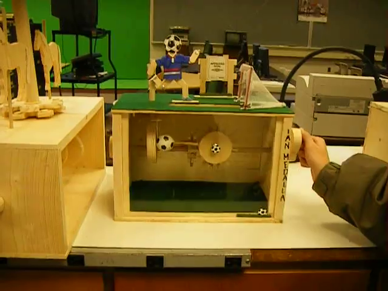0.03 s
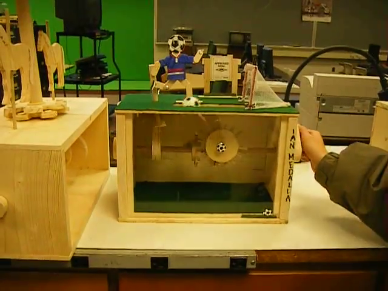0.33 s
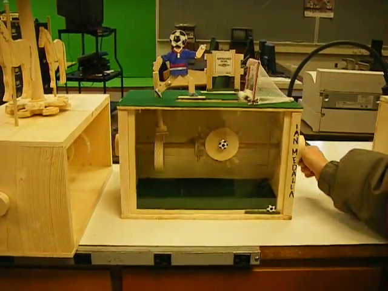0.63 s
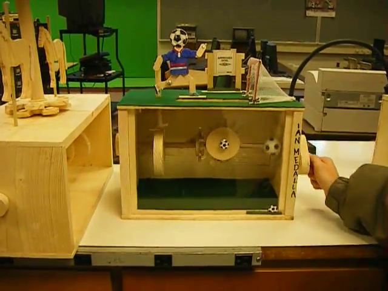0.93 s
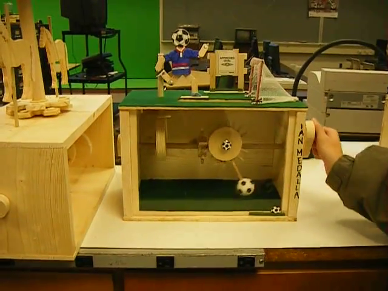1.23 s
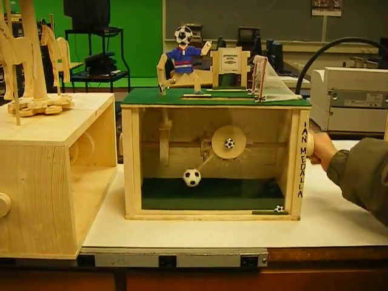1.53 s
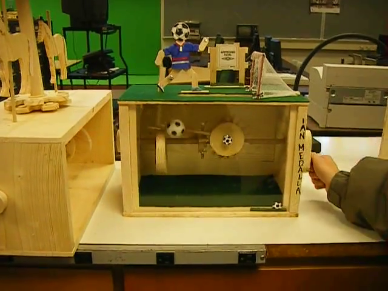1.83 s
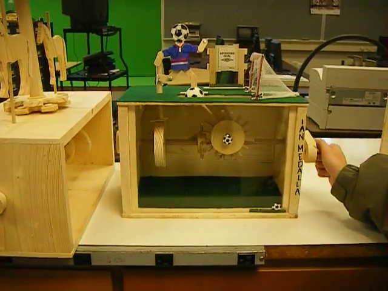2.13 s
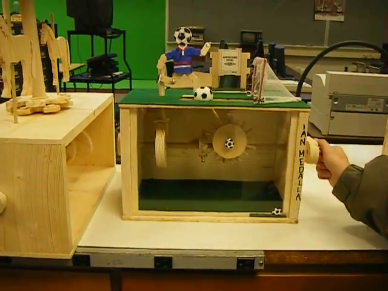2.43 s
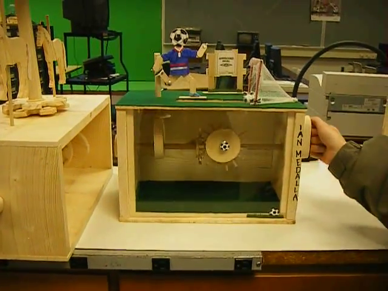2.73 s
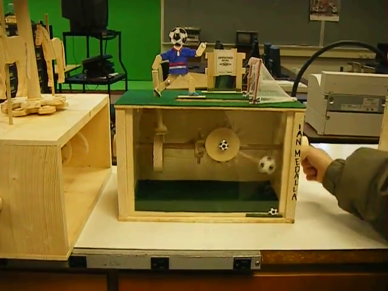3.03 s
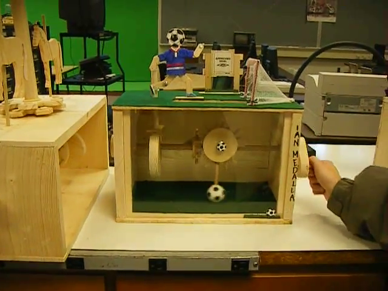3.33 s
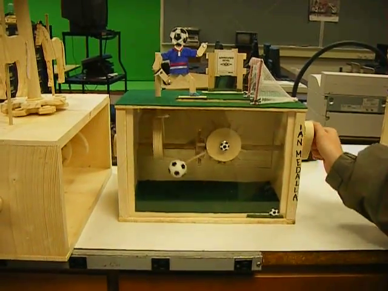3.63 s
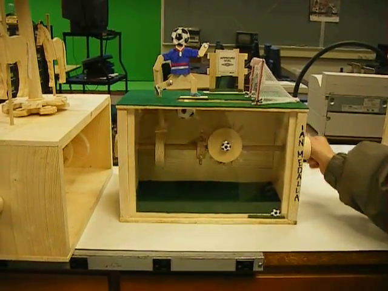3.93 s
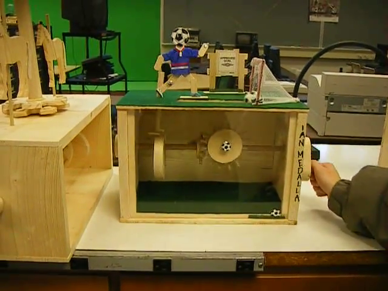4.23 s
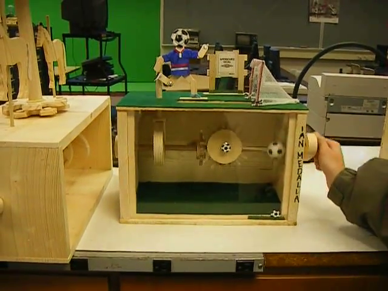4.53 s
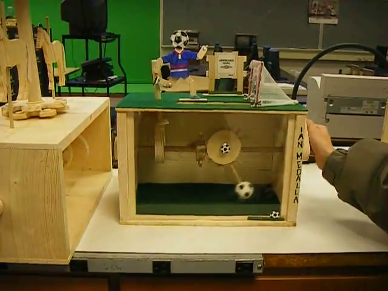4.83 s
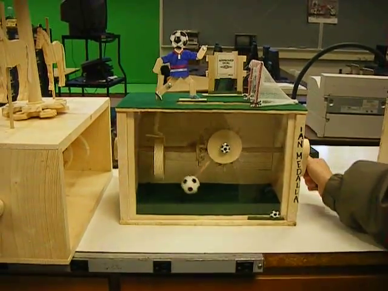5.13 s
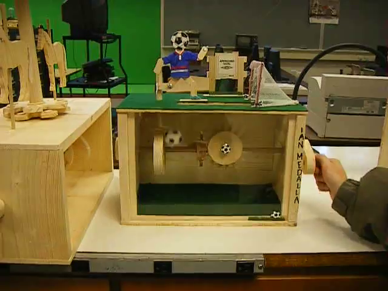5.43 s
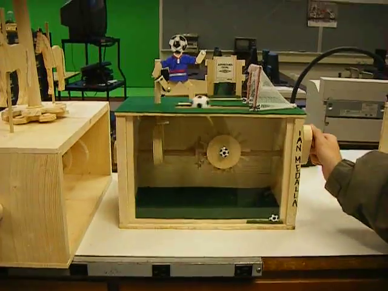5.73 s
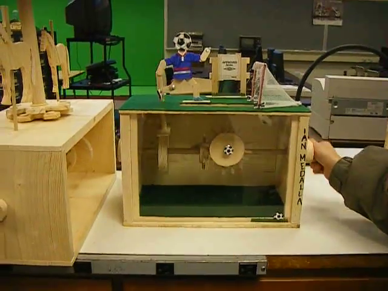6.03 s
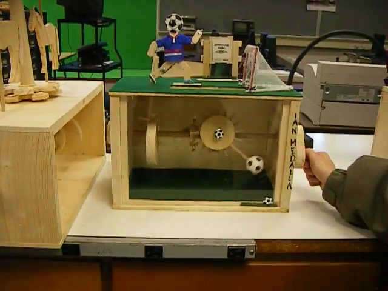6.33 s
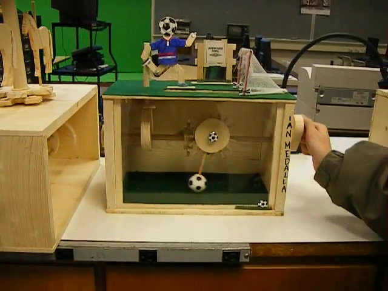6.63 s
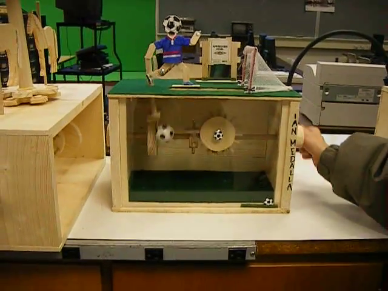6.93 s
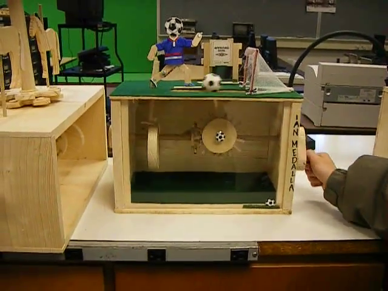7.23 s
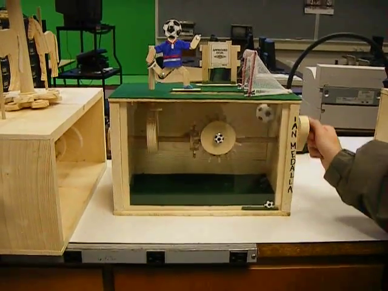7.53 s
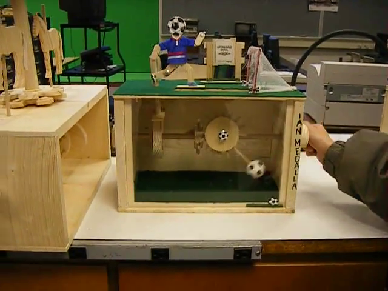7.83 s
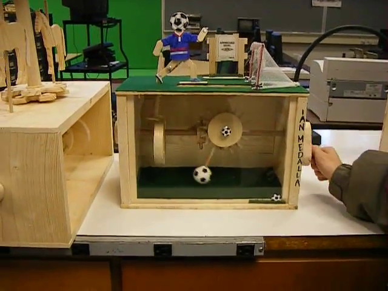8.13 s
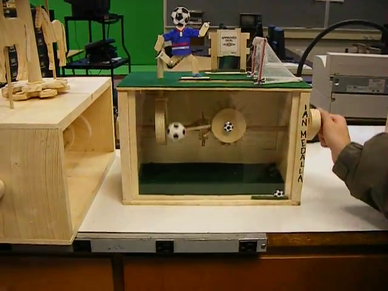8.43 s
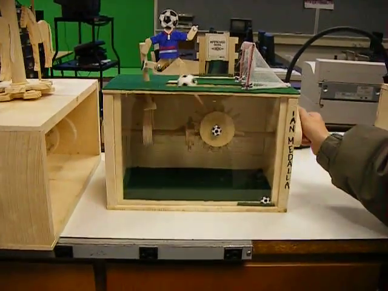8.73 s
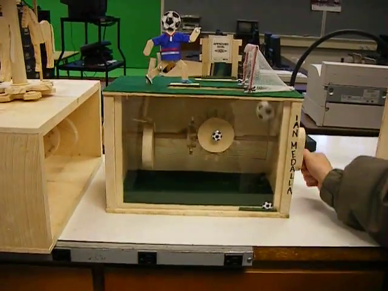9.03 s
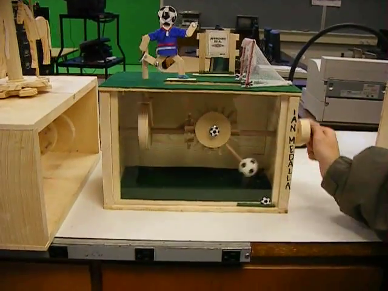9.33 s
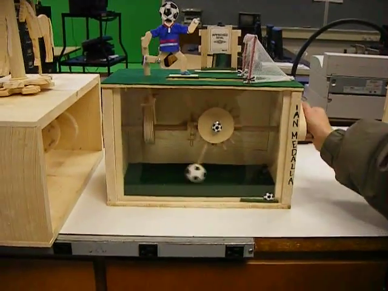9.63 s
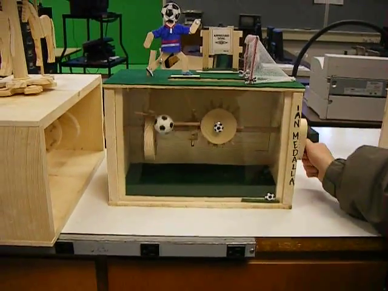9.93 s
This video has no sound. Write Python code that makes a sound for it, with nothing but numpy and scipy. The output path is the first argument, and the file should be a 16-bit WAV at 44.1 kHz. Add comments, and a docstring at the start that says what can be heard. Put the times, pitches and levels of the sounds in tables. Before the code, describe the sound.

Close up, a few sharp wooden snaps open the uneven rubbing and rattling of a hand-turned crank toy. Peg gears drag, stick and give way in short hollow judders, while a light rod ticks and small parts ping. Several harder clacks stand out later as the turning continues. A soft rush of air and a low fan hum fill the quiet room, and the treble is muffled.

```python
"""In a quiet room with a humming fan, a hand turns the crank of a wooden football toy.
The toy is a hollow box with shafts, peg gears and balls on spokes. Shafts rub, pegs catch, and the
gears jam and judder. Each tiny slip of wood on wood makes the box and one thin panel ring.
Loose parts snap, tick and ping. A nearby microphone dulls the treble, much like a telephone."""
import sys
import numpy as np
from scipy import signal
from scipy.fft import rfft, irfft
from scipy.io import wavfile

SR = 44100
rng = np.random.default_rng(int(sys.argv[2]) if len(sys.argv) > 2 else 0)


def file_out(sig):
    """Save sig as 16-bit WAV at sys.argv[1]."""
    # one column per channel
    cols = np.atleast_2d(sig).T
    # limit, then scale
    lim = np.clip(cols, -1, 1)
    pcm = np.round(lim * 32767).astype(np.int16)
    wavfile.write(sys.argv[1], SR, pcm)


N = 440118
CLOCK = np.arange(N) / SR

# Levels in the tables are relative: the functions turn them up or down.
# The rush of air from the vents. Each row: frequency in Hz, level in dB.
AIR_SPECTRUM = [(20, -27), (55, -13), (80, -16), (125, -10), (200, -10), (380, -2), (560, -7), (1050, -9),
                (1300, -14.5), (2600, -22.5), (4000, -38.5)]
# The fan's hum. Each row: pitch in Hz, width in Hz, level in dB.
FAN_HUM = [(147.3, 5.1, -49.5), (292, 43, -47.5)]

# Modes are the notes a part rings at; a wider one dies away sooner.
# Each row: pitch in Hz, width in Hz, level in dB.
BOX_MODES = [(193.6, 28, 0), (249.5, 57, -1.5), (291, 49.4, -1.5), (380.4, 66, 1), (445.6, 40, 0.5),
             (523.5, 26, 1), (599.5, 74, -3.5), (686, 49, -1), (794.6, 30.2, -0.5), (902.5, 41, -0.5),
             (1103, 44, -6.5), (1260, 130, -15), (1540, 120, -17), (1870, 340, -24.5)]  # the hollow box
PANEL_MODES = [(918, 53, 1.5), (959.2, 39.3, 8), (927, 210, -14.5), (1088, 70, -9.5), (1506, 110, -19.5)]  # the thin panel
GRIT_MODES = [(1625, 430, -2), (1870, 520, 1.5), (2418, 330, 2), (2504, 140, 6), (3000, 610, -2.5),
              (3550, 430, -1.5), (4220, 760, -5.5)]  # dry wood grain where parts touch
KNOCK_MODES = [(258, 120, 0), (407, 110, 0), (551, 62, 4), (737, 160, 2.5), (1030, 140, 6), (1660, 130, -1)]  # the box under a hard knock
CRACK_MODES = [(1210, 290, -4), (2153, 470, 5.5), (2410, 160, 9), (3166, 120, -6), (3266, 82, -3),
               (3390, 570, 0)]  # a small hardwood part
ROD_MODES = [(3060, 230, -15), (3630, 470, 1), (4033, 240, 1.5)]  # a light rod

# How loudly the shafts rub. Each row: time in seconds, box level in dB, grit level in dB.
RUBBING = [(0.05, -29, -42.5), (0.32, -32, -42.5), (1.59, -34, -46.5), (1.84, -30, -41),
           (2.83, -39.5, -48.5), (3.19, -29, -43), (3.63, -34.5, -46), (4.35, -28.5, -44.5),
           (4.62, -32, -45), (6.39, -30.5, -42.5), (7.0, -31.5, -46), (7.3, -27.5, -39), (7.66, -34, -45.5),
           (8.16, -28, -42), (8.6, -32.5, -42), (9.12, -27, -42.5), (9.51, -32, -41), (9.95, -29, -46)]
# Loose parts snap into place. Each row: start in seconds, chatter level in dB, pitch in Hz,
# chatter time in seconds, crack level in dB, knock level in dB.
PART_SNAPS = [(0.0576, -7.5, 435, 0.00045, -12.5, -12), (0.1611, -15, 2020, 0.00042, -15, -17),
              (0.3309, -21, 3780, 0.00078, -16, -34), (0.4732, -8, 2560, 0.00015, -3, -14.5),
              (0.5342, -26, 1470, 0.0028, -25, -15), (2.925, -25.5, 2800, 0.0028, -19.5, -26.5),
              (3.42, -26, 1630, 0.0058, -29, -31), (6.5333, -7.5, 1670, 0.00046, -6, -26),
              (6.5423, -10.5, 2670, 0.0013, -9.5, -11), (6.7595, -21, 2810, 0.0003, -14.5, -43),
              (6.9977, -3.5, 1800, 0.0037, 0.5, -6.5), (7.0875, -12.5, 1770, 0.00041, -33, -22.5),
              (7.8748, -8.5, 2265, 0.0016, -4.5, -3), (8.9682, -21, 2660, .001, -19, -14),
              (8.9719, -13, 1730, 0.0036, -7.5, -3)]
# A peg or ball drags over wood. Each row: start in seconds, length in seconds, box level in dB,
# panel level in dB, favoured box pitch in Hz.
PEG_CATCHES = [(0.123, 0.04, -57, -34, 510), (0.219, 0.026, -29.5, -41, 630),
               (0.246, 0.021, -23.5, -42, 630), (0.286, 0.045, -30, -38, 350),
               (0.364, 0.024, -36, -34.5, 250), (0.531, 0.02, -21.5, -25, 220),
               (0.635, 0.045, -31.5, -31, 200), (0.836, 0.035, -33, -37, 570),
               (1.168, 0.031, -30.5, -28, 490), (1.29, 0.031, -35, -33.5, 760),
               (1.719, 0.024, -25.5, -30.5, 360), (1.779, 0.036, -31, -33, 390),
               (1.808, 0.023, -30, -25, 850), (2.367, 0.052, -28.5, -38.5, 730),
               (2.927, 0.031, -15.5, -30, 200), (3.026, 0.029, -18, -35, 470), (3.2, 0.02, -29.5, -40, 680),
               (3.417, 0.045, -27, -30, 850), (3.488, 0.018, -34, -26.5, 240),
               (3.829, 0.049, -30.5, -35, 280), (3.931, 0.037, -31, -40, 540),
               (4.057, 0.021, -29.5, -47, 200), (4.298, 0.047, -30, -38, 200),
               (4.55, 0.022, -34, -31.5, 280), (4.733, 0.015, -30, -24.5, 850),
               (4.931, 0.016, -34, -31, 540), (5.504, 0.059, -46.5, -26, 280),
               (5.577, 0.054, -29.5, -27.5, 340), (5.847, 0.061, -34, -35.5, 200),
               (5.984, 0.023, -29.5, -35.5, 200), (6.589, 0.016, -35.5, -24.5, 280),
               (6.675, 0.014, -25.5, -27, 680), (7.108, 0.02, -24, -24.5, 850),
               (7.212, 0.018, -33.5, -26, 300), (7.479, 0.038, -25, -26.5, 680),
               (7.61, 0.054, -34, -36, 520), (7.872, 0.01, -17, -24, 850), (7.93, 0.029, -24.5, -39, 300),
               (8.018, 0.0093, -21, -26, 200), (8.042, 0.023, -26.5, -28, 450),
               (8.307, 0.026, -22, -21, 790), (8.455, 0.035, -41, -27, 300),
               (8.568, 0.034, -27, -22.5, 520), (8.676, 0.027, -23.5, -30.5, 510),
               (8.821, 0.024, -28.5, -31.5, 520), (8.97, 0.0099, -10.5, -16.5, 610),
               (9.404, 0.02, -51, -26, 280), (9.453, 0.019, -37, -29.5, 630), (9.556, 0.034, -29, -32, 520),
               (9.763, 0.012, -22, -48, 420)]
# A rod hits its slot. Each row: start in seconds, level in dB.
ROD_TICKS = [(0.414, -20), (0.6538, -21), (1.9869, -24.5), (2.0795, -19), (3.0065, -19.5), (3.9407, -23),
             (4.3394, -16.5), (4.4408, -15.5), (5.92, -20), (6.012, -18.5), (6.495, -22), (7.167, -22.5),
             (7.221, -22), (7.337, -19), (7.411, -15.5), (7.4803, -12), (7.8715, -15), (8.683, -20),
             (9.194, -8.5), (9.31, -16)]
# The gears jam once or twice a turn. Each row: start in seconds, length in seconds, box, panel and
# grit levels in dB, favoured box pitch in Hz, hardest moment as a share of the length.
GEAR_JAMS = [(0.912, 0.17, -24, -25.5, -37, 350, 0.39), (1.926, 0.18, -22.5, -30.5, -36.5, 800, 0.25),
             (2.957, 0.16, -26.5, -30.5, -40, 750, 0.38), (3.247, 0.14, -25, -30, -41.5, 710, 0.66),
             (4.347, 0.12, -21, -24, -35.5, 794, 0.45), (5.36, 0.099, -21.5, -22, -36, 880, 0.56),
             (6.117, .08, -21.5, -30, -41, 536, .35), (6.401, .16, -26, -36, -42.5, 564, 0.4),
             (7.339, .075, -23.5, -27, -39, 820, 0.52), (8.157, 0.12, -24, -34.5, -45, 460, 0.55),
             (9.195, 0.15, -20, -25.5, -35.5, 827, 0.31)]
# A small hard part pings. Each row: start in seconds, level in dB, pitch in Hz.
PART_PINGS = [(3.059, -30, 2550), (4.051, -26.5, 2640), (4.251, -37, 2600), (5.06, -28.5, 2614),
              (6.125, -29.5, 2610), (7.169, -28, 2580), (7.453, -27.5, 3020), (8.937, -30, 2680),
              (9.947, -34, 2606)]


def amp(db):
    """Turns decibels into a number to multiply by."""
    return 10 ** (np.asarray(db) / 20)


def unit(x):
    """Scales a signal to an average power of 1."""
    return x / np.sqrt(np.mean(x ** 2) + 1e-20)


def add(mix, start, sound):
    """Lays a sound into the mix at a start time in seconds."""
    part = mix[max(0, round(start * SR)):][:len(sound)]
    part += sound[:len(part)]


def ring(modes, tilt_db=0):
    """A part rings after one tap as a sum of fading tones. The tilt is per octave, up to 900 Hz."""
    t = np.arange(4096) / SR
    sound = np.zeros(len(t))
    for k, (hz, width, db) in enumerate(modes):
        level = amp(db + tilt_db * np.log2(min(hz, 900))) * width
        fade = np.exp(-np.pi * width * t)
        sound += (-1) ** k * level * fade * np.sin(2 * np.pi * hz * t)  # neighbours swing opposite ways
    return sound / np.linalg.norm(sound)


def slips(size, per_second, spread_db, hiss_level):
    """Rubbing wood sticks and slips, giving uneven jolts over a smooth hiss."""
    chance = rng.random(size)
    strength, hiss = rng.standard_normal((2, size))
    jolts = (chance < per_second / SR) * np.sign(hiss) * amp(spread_db * np.clip(strength, -2, 2))
    return unit(unit(jolts) + hiss_level * hiss)


def ventilation(air_db=-38):
    """Moving air makes a soft rush, and the fan adds a wavering hum."""
    hz = np.fft.rfftfreq(N, 1 / SR)
    points_hz, points_db = np.transpose(AIR_SPECTRUM)
    noise = rfft(rng.standard_normal(N))
    air_shape = amp(np.interp(np.log(hz + 1), np.log(points_hz), points_db))
    out = amp(air_db) * unit(irfft(noise * air_shape, N))
    for pitch, width, db in FAN_HUM:
        narrow_peak = 1 / (1 + (2 * (hz - pitch) / width) ** 2)
        out += amp(db) * unit(irfft(noise * narrow_peak, N))
    return out


def shafts(box_db=-2.5, grit_db=-2, panel_db=-14, unsteady_db=2.5, wander_hz=34.79, dark_hz=550):
    """Shafts rub unevenly in their holes; the soft contact brings out the box's low notes."""
    times, box_levels, grit_levels = np.transpose(RUBBING)
    wander = unit(np.interp(CLOCK * wander_hz, np.arange(4096), rng.standard_normal(4096)))
    grip = amp(unsteady_db * wander)
    dark_box = signal.lfilter(*signal.butter(1, dark_hz, fs=SR), ring(BOX_MODES))
    body = amp(box_db) * dark_box / np.linalg.norm(dark_box) + amp(panel_db) * ring(PANEL_MODES)
    coarse = unit(grip * slips(N, per_second=900, spread_db=4.5, hiss_level=1))
    coarse *= amp(np.interp(CLOCK, times, box_levels))
    fine = unit(grip * slips(N, per_second=560, spread_db=1.5, hiss_level=.73))
    fine *= amp(np.interp(CLOCK, times, grit_levels) + grit_db)
    return (signal.oaconvolve(coarse, body) + signal.oaconvolve(fine, ring(GRIT_MODES)))[:N]


def snaps(fade_s=.011, scrape_db=-24, scrape_s=.004):
    """A part snaps into place with a brief chatter, a crack, a knock on the box and a dry scrape."""
    out = np.zeros(N)
    knock, crack, grit = ring(KNOCK_MODES), ring(CRACK_MODES), ring(GRIT_MODES)
    knock, crack = knock / abs(knock).max(), crack / abs(crack).max()
    t = np.arange(len(knock)) / SR
    swell = t / scrape_s * np.exp(1 - t / scrape_s)
    for start, db, hz, hold_s, crack_db, knock_db in PART_SNAPS:
        chatter = np.sin(2 * np.pi * hz * t) * amp(db - 60 * np.maximum(t - hold_s, 0) / fade_s)
        add(out, start, chatter + amp(crack_db) * crack + amp(knock_db) * knock)
        scrape = slips(len(t), per_second=1700, spread_db=5, hiss_level=.5) * swell
        add(out, start, amp(crack_db + scrape_db) * signal.fftconvolve(scrape, grit))
    return out


def drag(length_s, levels_db, favoured_hz, firm_db=-21, reach_octaves=.31):
    """One peg catches and slides, shaking box, panel and grain (levels come in that order)."""
    size = int(np.clip(length_s * SR, 200, 4096))
    force = slips(4096, per_second=800, spread_db=4, hiss_level=.25)[:size]
    firmness = min(amp(levels_db[0] - firm_db), 1)
    # A firm peg lands with a blow, a light one leans in; both ease as they slide off.
    force *= np.interp(np.linspace(0, 1, size), [0, .3, 1], [firmness, 1, .26])
    force[0] += .42 * firmness * np.linalg.norm(force)
    crackle = np.sign(force) * abs(force) ** 1.6  # the hardest slips make the grain crackle
    # The spot it lands on lifts the box's notes near one pitch, more so under a firm blow.
    lift_db = 8 + 5 * firmness ** 2
    box = [(hz, width, db + lift_db * np.exp(-(np.log2(hz / favoured_hz) / reach_octaves) ** 2))
           for hz, width, db in BOX_MODES]
    sounds = [signal.fftconvolve(force, ring(box, tilt_db=1)),
              signal.fftconvolve(force, ring(PANEL_MODES)),
              signal.fftconvolve(crackle, ring(GRIT_MODES))]
    return np.sqrt(size) * sum(amp(db) * x / np.linalg.norm(x) for db, x in zip(levels_db, sounds))


def pegs(usual_db=-25, brush_count=76, brush_gap_s=.13, brush_s=.035, spread_db=3, middle_hz=420):
    """Pegs catch one by one; lighter ones brush past, their loudness following the shafts."""
    out = np.zeros(N)
    times, rub_levels, _ = np.transpose(RUBBING)
    brushes = []
    for k, (late, box_stray, panel_stray, spot) in enumerate(rng.standard_normal((brush_count, 4))):
        start = (k + .5 + late / 4) * brush_gap_s
        rub_db = np.interp(start, times, rub_levels)
        box_db = rub_db - 9 + spread_db * box_stray
        panel_db = rub_db - 10.5 + spread_db * panel_stray
        brushes.append((start, brush_s, box_db, panel_db, middle_hz * 2 ** (spot / 2)))
    for start, length, box_db, panel_db, favoured_hz in PEG_CATCHES + brushes:
        weight_db = 20 * np.log10(np.hypot(amp(box_db), amp(panel_db))) - usual_db
        grit_db = -43 + .85 * weight_db  # a heavier catch sounds grittier
        add(out, start, drag(length, (box_db, panel_db, grit_db), favoured_hz))
    return out


def ticks(gain_db=-1, buzz_db=-6, buzz_s=.025, shaken_db=12, ticks_per_jam=2):
    """A light rod lands with one sharp blow and buzzes to rest; each gear jam shakes it again."""
    out, t, rod = np.zeros(N), np.arange(1024) / SR, ring(ROD_MODES)
    shaken = [(start + length * place, grit_db + shaken_db)
              for start, length, _, _, grit_db, _, _ in GEAR_JAMS
              for place in rng.random(ticks_per_jam)]
    for start, db in ROD_TICKS + shaken:
        buzz = slips(len(t), per_second=1500, spread_db=3, hiss_level=.3) * amp(-60 * t / buzz_s)
        force = amp(buzz_db) * buzz / np.linalg.norm(buzz)
        force[0] += 1  # the blow
        sound = signal.fftconvolve(force, rod)
        add(out, start, amp(db + gain_db) * sound / abs(sound).max())
    return out


def gear_jams(easing_db=-15, stray_octaves=.35, unevenness=.06, drag_count=4):
    """Jammed gears give way in a quick, uneven run of drags that builds to a hardest moment and eases."""
    out = np.zeros(N)
    places = np.linspace(0, 1, drag_count)
    for start, length, *levels_db, favoured_hz, hardest in GEAR_JAMS:
        step_s = length / drag_count
        strays, delays = rng.standard_normal((2, drag_count))
        for k, (place, stray, late) in enumerate(zip(places, strays, delays)):
            effort_db = easing_db * (place - hardest) ** 2
            spot_hz = favoured_hz * 2 ** (stray_octaves * stray)
            sound = drag(.96 * step_s, np.array(levels_db) + effort_db, spot_hz)
            add(out, start + (k + unevenness * late * (k > 0)) * step_s, sound)
    return out


def pings(rise_s=.005, jitter_hz=600, rasp_level=.87):
    """A small hard part gives a short rasp and one unsteady note that swells and dies."""
    out, t, grit = np.zeros(N), np.arange(4096) / SR, ring(GRIT_MODES)
    swell = t / rise_s * np.exp(1 - t / rise_s)
    for start, db, hz in PART_PINGS:
        jitter, noise = rng.standard_normal((2, len(t)))
        tone = np.sin(2 * np.pi * np.cumsum(hz + jitter_hz * jitter) / SR) * swell
        rasp = signal.fftconvolve(noise * np.exp(-t / rise_s), grit)[:len(t)]
        add(out, start, amp(db) * (tone + rasp_level * rasp))
    return out


def room(sound, echo_db, fade_s=.35, echoes_per_second=2000):
    """The bench and walls send back faint, scattered echoes."""
    t = np.arange(SR // 2) / SR
    echoes = rng.choice([-1, 1], len(t)) * (rng.random(len(t)) < echoes_per_second / SR)
    echoes = echoes * (t > .005) * amp(-60 * t / fade_s)
    return sound + amp(echo_db) * signal.oaconvolve(sound, echoes / np.linalg.norm(echoes))[:N]


def scene(bass_cut_hz=115):
    """The toy plays on its bench in the humming room; so small a box gives off little bass."""
    toy = room(gear_jams() + pegs() + shafts() + ticks() + pings(), echo_db=-10)
    toy += room(snaps(), echo_db=-38)
    toy = signal.lfilter(*signal.butter(2, bass_cut_hz, "highpass", fs=SR), toy)
    return (toy + ventilation())[None]


def record(dry, offset=-.016, ceiling=.73, silent_s=.034):
    """The microphone cuts the treble, overloads on the hardest snaps and opens after a brief silence."""
    points_hz = [0, 3300, 3650, 4000, 4250, 4450, 4650, SR / 2]
    points_db = [0, 0, -2, -9, -17, -33, -90, -120]
    treble_cut = signal.firwin2(511, points_hz, amp(points_db), window=("kaiser", 9), fs=SR)
    dulled = signal.oaconvolve(dry, treble_cut[None], "same")
    flattened = np.clip(dulled + offset, -ceiling, ceiling)
    fade_in = np.clip((CLOCK - silent_s) / .003, 0, 1)
    smoothing = signal.firwin(255, 16500, window=("kaiser", 9), fs=SR)  # trims the overload's top fizz
    return signal.oaconvolve(flattened * fade_in, smoothing[None], "same")


dry = scene()
out = record(dry)
file_out(out)
```